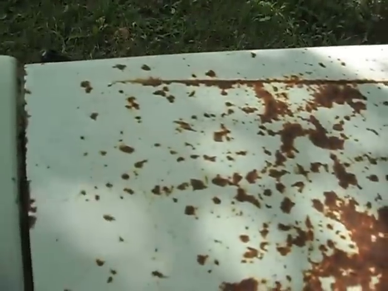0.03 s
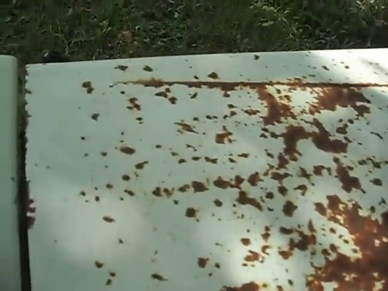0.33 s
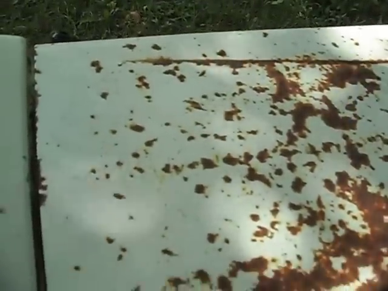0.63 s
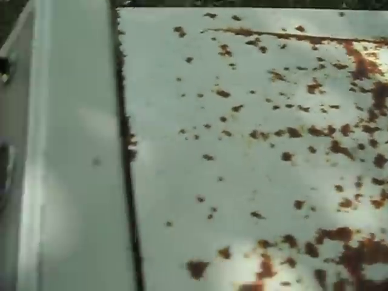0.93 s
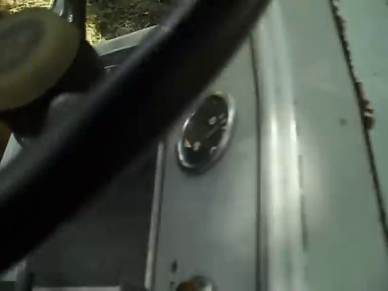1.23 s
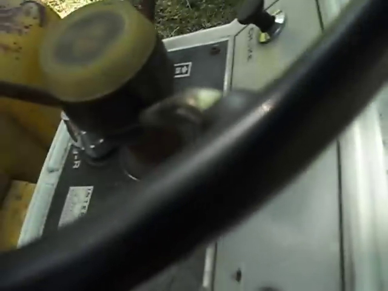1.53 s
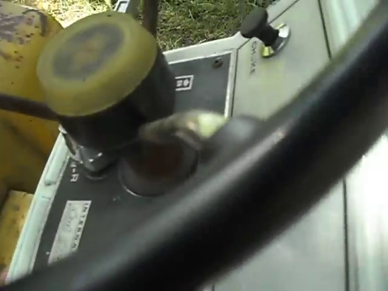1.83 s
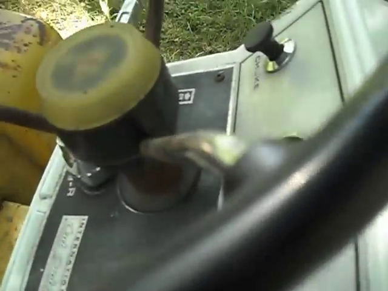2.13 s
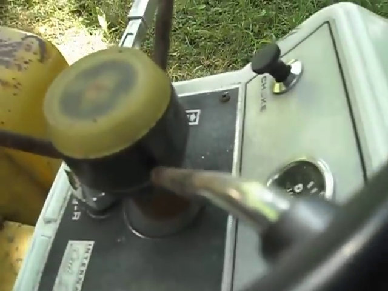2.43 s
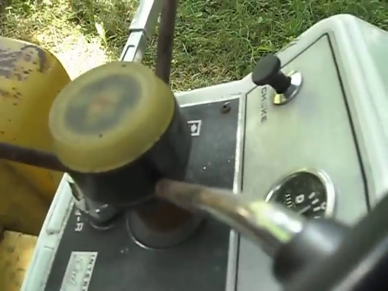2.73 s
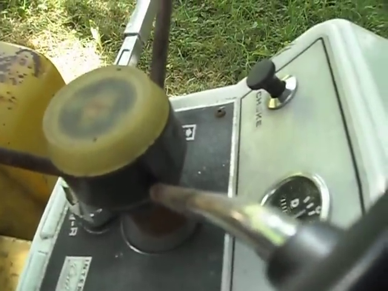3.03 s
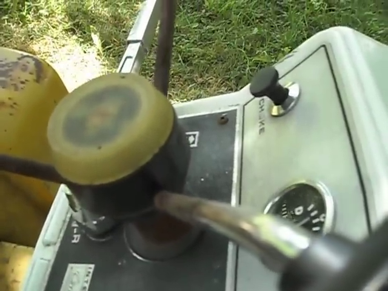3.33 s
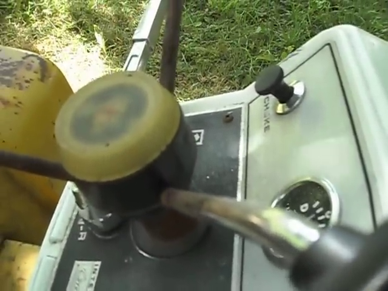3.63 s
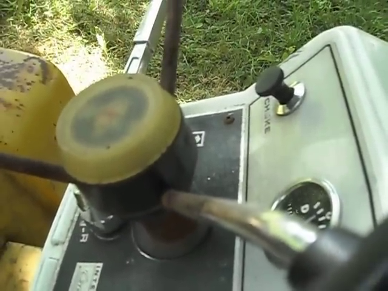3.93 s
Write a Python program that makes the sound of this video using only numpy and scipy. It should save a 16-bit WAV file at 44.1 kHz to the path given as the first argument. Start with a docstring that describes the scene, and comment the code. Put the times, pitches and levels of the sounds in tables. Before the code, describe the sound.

An old tractor's steel controls clunk close by at about 0.2, 0.8 and 1.5 seconds, each ringing briefly, with lighter clicks near 1.2, 1.9 and 3.1 seconds. Insects trill throughout over soft outdoor hiss and a distant drone. A small motor whirrs faintly around 1.3 seconds and from 2 seconds on. Soft low bumps come and go while another far engine speeds up, loudest near 3.7 seconds.

```python
"""An old tractor's controls, heard from the seat on a summer day. From the outset insects trill and
pulse in the grass over a soft hiss and a far engine's drone. In the first second and a half loose steel
parts strike and ring in three clunks; a few light clicks fall between and after. A small motor whirrs
faintly just before the third clunk and again from about 2 s on. Soft low bumps come and go,
while a second far engine slowly gathers speed and is loudest near the end."""
import sys
import numpy as np
from scipy import signal
from scipy.fft import rfft, irfft
from scipy.io import wavfile
from scipy.ndimage import uniform_filter1d

SR = 44100
rng = np.random.default_rng(int(sys.argv[2]) if len(sys.argv) > 2 else 0)


def wav_out(sig):
    """Save sig, one row per channel (or a flat mono array), as 16-bit PCM at SR to the path in sys.argv[1]."""
    wavfile.write(sys.argv[1], SR, np.round(np.clip(np.atleast_2d(sig).T, -1, 1) * 32767).astype(np.int16))


N = 4 * SR

# impacts in the linkage: t/s, level/dB in each of the five IMPACT_BANDS_HZ, rattle time constant/s
IMPACTS = [(0.2027, -60, -33.5, -32.5, -39.5, -39, 0.0068), (0.2124, -60, -33, -43, -52, -54, .015),
           (.8235, -40, -46, -53, -47, -56, .006), (.829, -28, -34.5, -41, -41, -46, 0.0062),
           (.8395, -40.5, -36, -49, -50, -61, 0.0049), (.8555, -47, -52, -56, -55, -64, 0.0055),
           (.861, -44, -38.5, -45.5, -41, -59, 0.012), (.876, -42, -45.5, -54, -59, -68, 0.0072),
           (1.2058, -51, -54, -53.5, -48, -52, 0.0084), (1.238, -72, -70, -67, -48.5, -61, .005),
           (1.368, -64, -55, -60, -55, -61, .003), (1.467, -57, -53, -51, -53, -58, .006),
           (1.474, -32, -30.5, -41.5, -43, -45.5, 0.0079), (1.4955, -39, -40.5, -41.5, -42.5, -50, 0.01),
           (1.509, -44, -41, -50, -52, -65, 0.011), (1.9382, -53, -50.5, -52, -50.5, -49.5, .009),
           (1.95, -60, -52, -56, -62, -68, 0.016), (1.999, -70, -66, -67, -54.5, -68, .005),
           (3.14, -59, -45.5, -62, -63, -70, 0.01)]
IMPACT_BANDS_HZ = 261, 510, 1230, 2710, 5500  # thud, body, clank, clink, snap
# normal modes of the linkage and panel: f/Hz, relative level/dB, T60/s
STEEL_MODES = [(136, -10, 0.16), (215, -5, .1), (278, -2.5, 0.064), (319, -12, .42), (352.5, -1, 0.068),
               (433, 0, 0.087), (508, -12.5, .16), (636, -6.5, 0.11), (759, -11.5, 0.1), (1051, -9.5, .07),
               (1253, -11, 0.093), (1480, -20.5, .09), (1770, -9, 0.074), (2370, -13, 0.1),
               (5270, -7.5, 0.031)]
# spectrum of the rattle: f/Hz, relative level/dB
RATTLE_SPECTRUM = [(60, -8), (200, 0.5), (330, 5), (450, 1.5), (700, 5.5), (1000, 6.5), (2000, 4),
                   (3000, -.5), (4000, -3.5), (5300, 0.5), (7000, -6), (9500, -16), (11500, -30)]
# reverberation time of the yard: f/Hz, T60/s
ECHO_DECAY = [(150, 0.9), (400, .55), (1300, 0.44), (3000, 0), (8000, 0.5)]
# spectrum of its echo: f/Hz, relative level/dB
ECHO_SPECTRUM = [(150, -10), (330, -6.5), (480, -13), (700, -7.5), (1300, -7.5), (3000, -11), (8000, -17)]
# bands of massed insects: f/Hz, bandwidth/Hz, level/dB
CHORUS_BANDS = [(3185, 200, -85), (3743, 110, -79.5), (4110, 400, -83), (5020, 400, -84), (8290, 740, -73),
                (8860, 370, -75.5)]
# nearer insects: f/Hz, bandwidth/Hz, pulse rate/Hz, first pulse t/s, half sweep/Hz, pulse sharpness,
# level/dB at the start, middle and end
NEAR_INSECTS = [(8966, 110, 18.3, 0.0218, 222, 1.8, -74.5, -74, -78),
                (8157, 140, 18.6, .022, 160, 2.2, -73, -79.5, -87),
                (5060, 200, 64.4, .005, 72, 1, -81.5, -85, -92),
                (7190, 170, 18.1, .03, 80, 1.1, -100, -84.5, -84.5)]
# run-up of the far engine: t/s, firing rate/Hz, relative level/dB
ENGINE_RUN_UP = [(0, 58, -79), (1.4, 63.96, -64.5), (1.8, 65, -69.5), (2.3, 67, -60.5), (2.9, 69.05, -57),
                 (3.3, 71.42, -56.5), (3.7, 75.5, -53), (4, 79.47, -54.5)]
# its harmonics: multiple of the firing rate, relative level/dB
ENGINE_HARMONICS = [(1, -17.5), (2, 0), (3, -12.5), (4, -13), (5, -13), (6, -19.5), (7, -24)]
# its roar: f/Hz, relative level/dB
ROAR_SPECTRUM = [(20, -13.5), (60, 0.5), (110, -2), (200, -10), (450, -18.5), (700, -26), (1400, -37),
                 (4000, -59)]
# tones of the steady engine: f/Hz, level/dB, rms wander/Hz, rms flutter/dB
DRONE_TONES = [(29.9, -51, 0.48, 1), (81.1, -61.5, 1.8, 3.5)]
# runs of the small motor: start t/s, end t/s, relative level/dB
MOTOR_SPANS = [(1.238, 1.475, -64.5), (1.933, 4.1, -64.5)]
# its resonances: f/Hz, bandwidth/Hz, relative level/dB
MOTOR_RESONANCES = [(277.2, 14, 1), (336, 48, -5.5), (445, 76, -8), (656, 240, -9), (823, 20, -8.5),
                    (881.7, 18, -6), (988, 28, -16), (900, 660, -13)]
# low bumps: centre t/s, duration/s, level/dB at the crest
LOW_BUMPS = [(.15, 0.053, -52), (.68, 0.15, -54.5), (1.927, 0.27, -57), (2.396, .07, -49.5),
             (2.51, 0.074, -51.5), (2.673, 0.077, -50), (3.423, .05, -53)]
# still air and the farthest insects: f/Hz, relative spectral density level/dB
AIR_SPECTRUM = [(10, -83.5), (25, -76), (55, -75.5), (110, -81.5), (190, -88), (400, -97), (700, -101),
                (1300, -107.5), (1900, -108), (2600, -110.5), (4200, -111.5), (6200, -114), (7400, -112),
                (9500, -113), (10200, -118), (10900, -130), (11800, -135)]


def clunks():
    """Superposition: closely spaced impacts merge into clunks, and the yard echoes them."""
    direct = np.zeros(N)
    for start, *levels_db, rattle_decay_s in IMPACTS:
        add(direct, start, impact(levels_db, rattle_decay_s))
    return direct + yard_echo(direct)


def impact(levels_db, rattle_decay_s, ring_db=-3.5, ring_rise_s=0.0026, rattle_rise_s=0.0028):
    """Impulse excitation: loose steel parts chatter briefly and set damped normal modes ringing."""
    t = np.arange(SR // 2) / SR
    force = list(zip(IMPACT_BANDS_HZ, levels_db))
    ring = 0
    for hz, db, t60 in STEEL_MODES:
        envelope = amp(db + value_at(force, hz)) * np.exp(-np.log(1000) * t / t60)
        ring += envelope * np.sin(2 * np.pi * (hz * t + rng.random()))
    ring *= np.minimum(t / ring_rise_s, 1)
    rattle = coloured(coloured(rng.standard_normal(len(t)), RATTLE_SPECTRUM), force)
    rattle *= np.minimum(t / rattle_rise_s, 1)
    rattle *= np.exp(-np.maximum(t - rattle_rise_s, 0) / rattle_decay_s)
    return amp(ring_db) * ring + rattle


def yard_echo(direct, rise_s=0.014):
    """Reverberation: diffuse reflections decay exponentially, most slowly in the bass."""
    hz, _, spectra = signal.stft(rng.standard_normal(SR), SR, nperseg=256)
    t = np.arange(spectra.shape[1]) * 128 / SR  # frames overlap by half
    damping = np.log(1000) / value_at(ECHO_DECAY, hz)[:, None]
    decay = np.exp(-damping * t) * np.sqrt(2 * damping / SR)  # normalised for energy
    colour = amp(value_at(ECHO_SPECTRUM, hz))[:, None]
    tail = signal.istft(spectra * decay * colour, SR, nperseg=256)[1]
    tail *= np.minimum(np.arange(len(tail)) / SR / rise_s, 1)
    return signal.fftconvolve(direct, tail)[:N]


def insects(jitter_cycles=0.07):
    """Stridulation: each wing stroke is a falling tone, blurred by grass; the crowd merges into bands."""
    t = np.arange(N) / SR
    out = sum(amp(db) * noise_band(hz, width) for hz, width, db in CHORUS_BANDS)
    for hz, width, rate, first, half_sweep, sharpness, *levels in NEAR_INSECTS:
        strokes = (t - first) * rate + jitter_cycles * noise_band(0, 6)
        offset = (strokes + .5) % 1 - .5  # cycles from the middle of the stroke
        pulse = 0.13 + abs(np.cos(np.pi * offset)) ** (2 * sharpness)
        blur = noise_band(0, width) + 1j * noise_band(0, width)
        pitch = hz - 2 * half_sweep * offset
        tone = (blur * np.exp(2j * np.pi * np.cumsum(pitch) / SR)).real
        level_db = np.interp(t, np.linspace(0, t[-1], len(levels)), levels)
        out += unit_rms(pulse * tone) * amp(level_db)
    return out


def rising_engine(wander=0.01187, flutter_db=3, roar_db=-5):
    """Harmonic series: the partials climb with the firing rate and swell along with a broadband roar."""
    t = np.arange(N) / SR
    times, rates, levels = np.transpose(ENGINE_RUN_UP)
    firing_hz = np.interp(t, times, rates) * (1 + wander * noise_band(0, 24.8))
    harmonics = sum(amp(db) * wavering(k * firing_hz, flutter_db) for k, db in ENGINE_HARMONICS)
    roar = amp(roar_db) * unit_rms(coloured(rng.standard_normal(N), ROAR_SPECTRUM))
    return amp(np.interp(t, times, levels)) * (harmonics + roar)


def droning_engine():
    """Nearly periodic vibration: a far engine at steady speed gives two deep, slightly wandering tones."""
    return sum(amp(db) * wavering(hz + wander * noise_band(0, 8), flutter_db)
               for hz, db, wander, flutter_db in DRONE_TONES)


def wavering(hz, flutter_db):
    """Amplitude modulation: a tone's level flutters on its way through the air."""
    tone = np.sin(2 * np.pi * np.cumsum(hz) / SR)
    return unit_rms(tone * amp(flutter_db * noise_band(0, 15)))


def small_motor(ramp_s=0.028):
    """Resonance: a small gear train whirrs in fixed frequency bands while it runs."""
    t = np.arange(N) / SR
    running = sum(amp(db) * np.clip(np.minimum(t - start, end - t) / ramp_s, 0, 1)
                  for start, end, db in MOTOR_SPANS)
    return running * sum(amp(db) * noise_band(hz, width) for hz, width, db in MOTOR_RESONANCES)


def bumps():
    """Gaussian envelopes: brief swells of low noise are heard as soft bumps."""
    t = np.arange(N) / SR
    swells = sum(amp(db) * np.exp(-(2 * (t - centre) / length) ** 2) for centre, length, db in LOW_BUMPS)
    return swells * noise_band(hz=65, width_hz=71)


def air(gain_db=0.5, patch_db=1.5):
    """Ambient noise: a soft outdoor hiss whose level drifts in patches of time and frequency."""
    hiss = coloured(rng.standard_normal(N), AIR_SPECTRUM) * np.sqrt(SR / 2)
    spectra = signal.stft(hiss, SR, nperseg=512)[2]
    patches = uniform_filter1d(rng.standard_normal(spectra.shape), size=8, axis=0)
    patches = unit_rms(uniform_filter1d(patches, size=14, axis=1))
    return signal.istft(spectra * amp(gain_db + patch_db * patches), SR, nperseg=512)[1][:N]


def noise_band(hz, width_hz):
    """Band-pass filtering: noise of rms 1 and given half-power width; about 0 Hz, a random drift."""
    f = np.fft.rfftfreq(N, 1 / SR)
    bell = .5 ** (2 * ((f - hz) / width_hz) ** 2)
    return unit_rms(irfft(rfft(rng.standard_normal(N)) * bell, N))


def coloured(x, spectrum):
    """Linear filtering: each frequency is weighted by a curve of f/Hz, level/dB."""
    hz = np.fft.rfftfreq(len(x), 1 / SR)
    return irfft(rfft(x) * amp(value_at(spectrum, hz)), len(x))


def value_at(curve, hz):
    """Interpolation on a logarithmic frequency axis."""
    f, values = np.transpose(curve)
    return np.interp(np.log(hz + 1), np.log(f + 1), values)


def amp(db):
    """The decibel law: 20 dB is a tenfold amplitude."""
    return 10 ** (np.asarray(db) / 20)


def unit_rms(x):
    """Normalisation to rms 1."""
    return x / np.sqrt(np.mean(abs(x) ** 2) + 1e-30)


def add(mix, start_s, sound):
    """Superposition of a delayed sound on the mix, in place."""
    part = mix[round(start_s * SR):][:len(sound)]
    part += sound[:len(part)]


def scene():
    """Superposition: the pressures of all sources add at one listening point."""
    mix = clunks() + air() + insects() + droning_engine() + rising_engine() + small_motor() + bumps()
    return mix[None]


def record(dry, cutoff_hz=11700):
    """Band limiting: a steep low-pass filter removes the highest treble."""
    low_pass = signal.firwin(511, cutoff_hz, window=("kaiser", 9), fs=SR)
    return signal.oaconvolve(dry, low_pass[None], "same")


dry = scene()
out = record(dry)
wav_out(out)
```